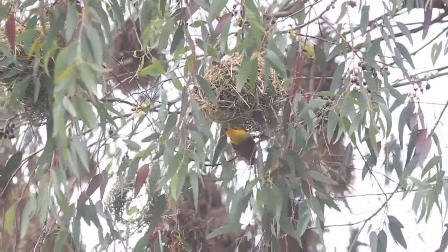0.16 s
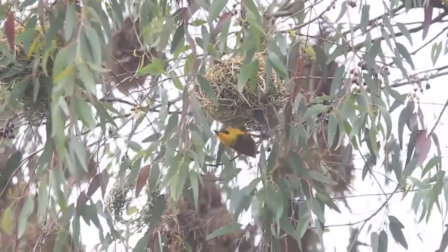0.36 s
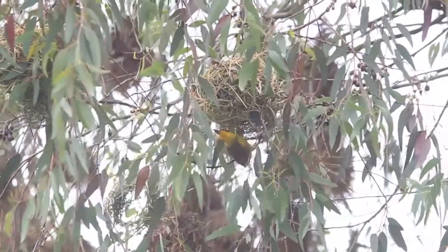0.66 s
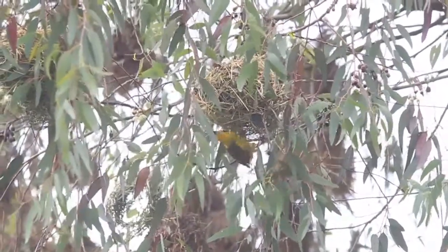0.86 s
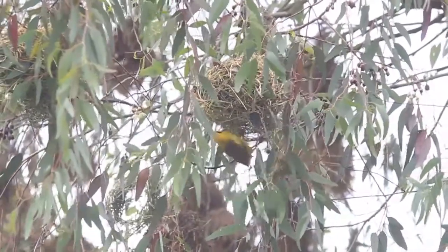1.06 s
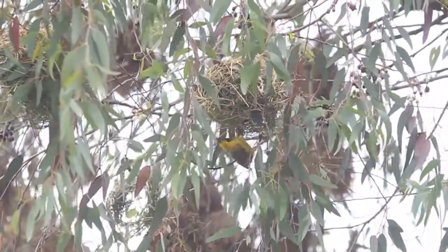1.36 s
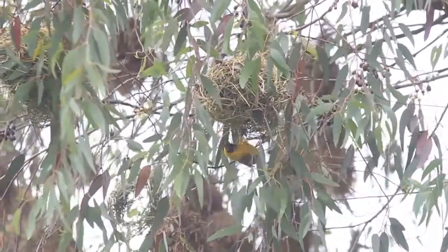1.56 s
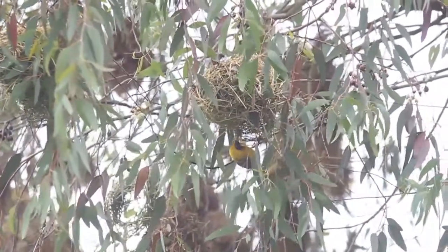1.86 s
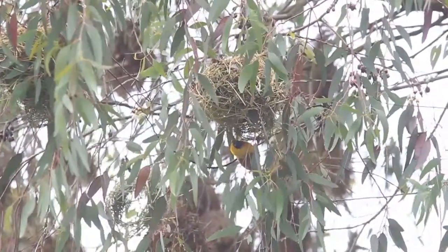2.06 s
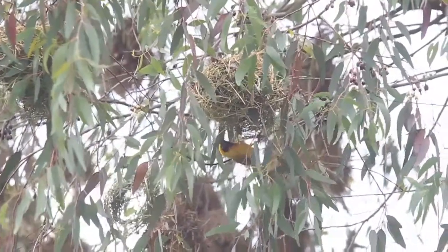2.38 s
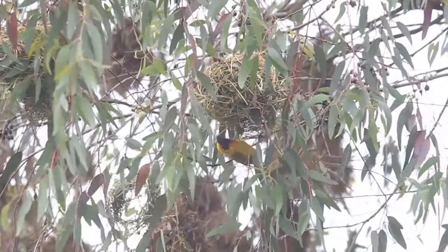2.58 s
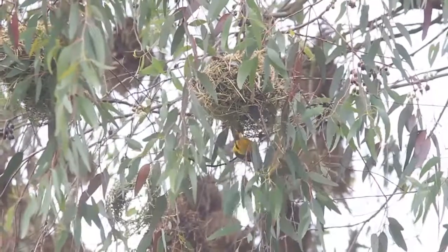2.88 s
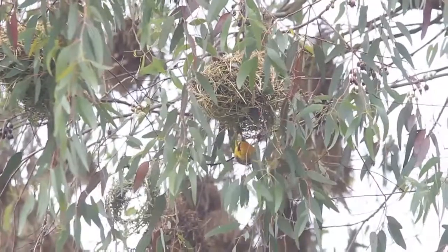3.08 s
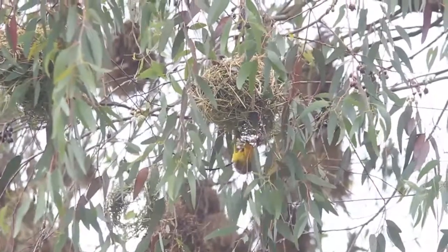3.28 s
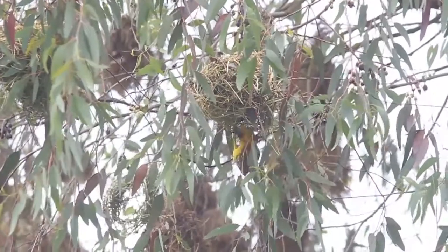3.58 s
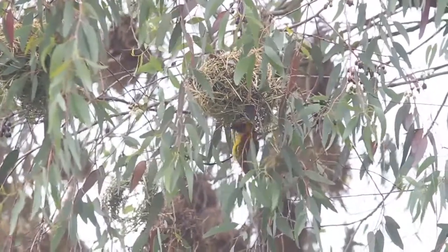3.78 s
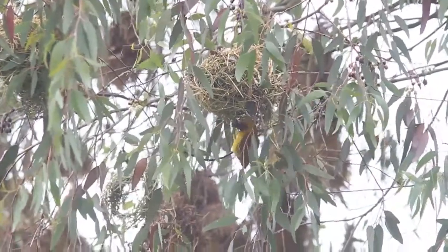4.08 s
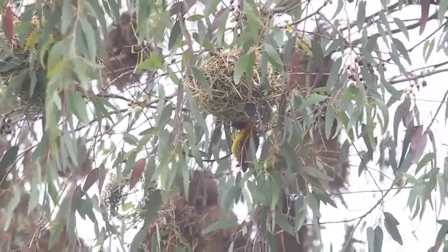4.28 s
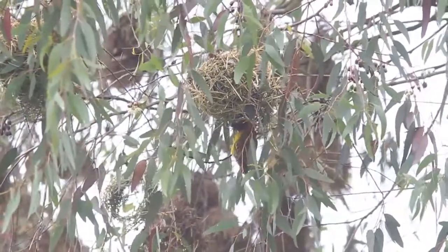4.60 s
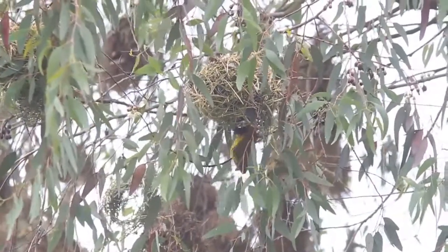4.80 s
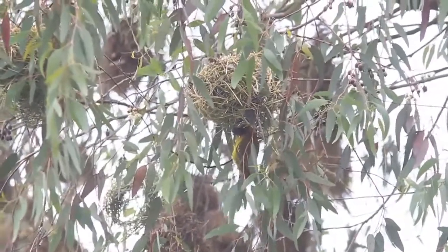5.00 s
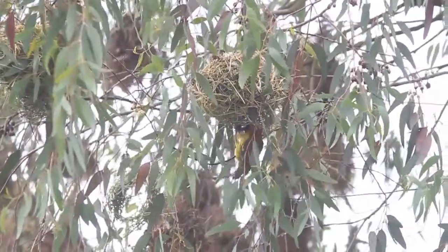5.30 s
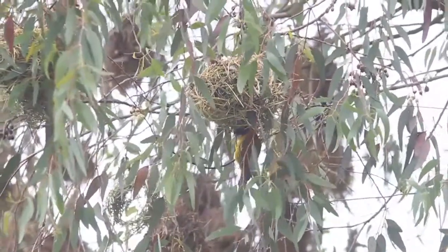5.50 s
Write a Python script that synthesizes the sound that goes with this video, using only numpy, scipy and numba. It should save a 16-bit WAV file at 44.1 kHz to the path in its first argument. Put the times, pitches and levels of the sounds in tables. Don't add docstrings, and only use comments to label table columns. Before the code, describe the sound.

Dense bird chatter outdoors: dry clicks and chips, two loud falling whistles, a quick rattle, a long mechanical buzz, then a wing rush and sharp crack.

```python
import sys
import numpy as np
from scipy import signal
from scipy.fft import rfft, irfft
from scipy.io import wavfile
from scipy.ndimage import uniform_filter1d
from numba import njit

SR = 44100
rng = np.random.default_rng(int(sys.argv[2]) if len(sys.argv) > 2 else 0)


def amplitude_ratio(level_db):
    exponent = np.asarray(level_db, float) / 20
    return 10 ** exponent


def master_out(mix):
    frames = np.transpose(np.atleast_2d(mix))
    ceiling = np.clip(frames, -1, 1)
    pcm = np.round(ceiling * 32767).astype(np.int16)
    wavfile.write(sys.argv[1], SR, pcm)


N = 249165
T = np.arange(N) / SR


def noise():
    return rng.standard_normal(N)


def level(x, db):
    return x * amplitude_ratio(db) / np.sqrt(np.mean(x ** 2))


@njit
def svf(x, hz, width):
    y, b, l = np.empty(len(x)), 0., 0.
    for i in range(len(x)):
        g, k = np.tan(np.pi * hz[i] / SR), width / hz[i]
        v = (b + g * (x[i] - l)) / (1 + g * (g + k))
        b, l, y[i] = 2 * v - b, l + 2 * g * v, k * v
    return y


def band(x, hz, width):
    return svf(x, np.full(len(x), 1. * hz), 1. * width)


def double_band(x, hz, width, second_width):
    return band(band(x, hz, width), hz, second_width)


def colour(x, points):
    hz, db = np.transpose(points)
    f = np.maximum(np.arange(N // 2 + 1) * SR / N, 1)
    return irfft(rfft(x) * amplitude_ratio(np.interp(np.log(f), np.log(hz), db)), N)


def walk(rate):
    k = int(SR / rate)
    steps = np.repeat(rng.standard_normal(N // k + 1), k)
    return level(uniform_filter1d(uniform_filter1d(steps, k), k)[:N], 0)


def hump(start, length, lean=1):
    return np.sin(np.pi * np.clip((T - start) / length, 0, 1) ** lean) ** 2


def whistles(notes, partials, rough, edge_s=0.003, size=200):
    out, shake = np.zeros(N), walk(500)
    for note in notes:
        s, hz, db = np.transpose(note)
        on = (T >= s[0]) & (T < s[-1])
        glide = uniform_filter1d(np.interp(T[on], s, hz), size=size, mode="nearest")
        phase = 2 * np.pi * np.cumsum(glide * (1 + 0.049 * rough * shake[::-1][on])) / SR
        edge = np.clip(np.minimum(T[on] - s[0], s[-1] - T[on]) / edge_s, 0, 1)
        tone = np.sin(phase) + sum(amplitude_ratio(o) * np.sin(k * phase) for k, o in partials)
        size_now = np.sqrt(2) * amplitude_ratio(np.interp(T[on], s, db)) * edge
        out[on] += size_now * (1 + rough * shake[on]) * tone
    return out


def shape_notes(rows, contour, swell_db, fade_db=0):
    u = np.linspace(0, 1, 13)
    swell = swell_db * (2 * u - 1) ** 2 + fade_db * u
    return [np.transpose([s + u * ms / 1000, contour(u, hz, end), db - swell])
            for s, ms, hz, end, db in rows]


def slide(u, hz, end):
    return hz + (end - hz) * u


def arc(start):
    def contour(u, hz, end):
        a, b = np.sqrt(abs(1 - start) * hz), np.sqrt(abs(hz - end))
        return hz - np.sign(1 - start) * ((a + b) * u - a) ** 2
    return contour


def hook(u, hz, _):
    return hz * (1 + 0.36 * np.clip(1 - u / .36, 0, 1) ** 1.23 - 0.13 * (u - .3))


# f/Hz, level/dB per Hz
THROAT = [(590, -17.5), (1000, -19), (1360, -3.5), (1560, -13), (2170, -4), (3150, -1.5), (3890, -0.5),
          (4740, -1.5), (5790, -6), (8240, -11), (14000, -50)]


def syrinx(hz, jitter, breath, since_s=None):
    phase = np.cumsum(hz * (1 + jitter * walk(900))) / SR
    if since_s is not None:
        phase = hz * since_s + 2 * jitter * walk(400)
    clicks = np.clip(np.diff(np.floor(phase), prepend=0), 0, 1) * amplitude_ratio(1.5 * noise())
    spread = np.exp(-1j * (np.arange(N // 2 + 1) * SR / N / 1300) ** 2)
    clicks = irfft(rfft(clicks - clicks.mean()) * spread, N)
    return level(colour(level(clicks, 0) + breath * noise(), THROAT), 0)


def click_bursts(table, lean, breath):
    s, _, _, mouth = np.transpose(table)
    gate = sum(amplitude_ratio(db - 12.0) * hump(t - .002, ms / 1000, lean) for t, db, ms, _ in table)
    voice = syrinx(830, 0.079, breath) * gate
    mouth_hz = mouth[np.clip(np.searchsorted(s, T + .004) - 1, 0, None)]
    return voice + amplitude_ratio(4.0) * svf(voice, mouth_hz, 290.0) + amplitude_ratio(4.0) * band(voice, 1340, 730)


# f/Hz, level/dB per Hz
AIR = [(12, -22), (20, 4.5), (38, -3.5), (70, -1), (464, -6.5), (871, -8), (1140, -17.5), (1570, -12.5),
       (3000, -16.5), (3900, -70), (6600, -120)]
# f/Hz, level/dB per Hz
HISS = [(4000, -18), (8000, 7), (12800, -3.5), (14800, -18), (15600, -22)]


def air():
    rumble = level(colour(noise(), AIR), -56) * amplitude_ratio(0.33 * walk(5.64))
    hum = amplitude_ratio(-56.5) * np.sin(2 * np.pi * 25 * T) * amplitude_ratio(1.2 * walk(8.0))
    return rumble + hum + level(colour(noise(), HISS), -68)


# f/Hz, level/dB per Hz
INSECTS = [(5600, -40), (6100, -10), (6800, 0), (7300, -1), (7650, -8), (8050, -23), (9300, -30),
           (11000, -50)]


def insects():
    flutter = amplitude_ratio(2 * walk(110) + 1.8 * walk(11))
    return level(colour(noise() * flutter, INSECTS), -52)


# f/Hz, level/dB at start, middle and end
CRICKETS = [
    (6655, -49.5, -48.5, -49.5),
    (7610, -47.5, -59, -71),
    (7140, -49, -53, -51),
    (5150, -58, -52.5, -66),
]
# first pulse t/s, chirp period/s, pulses a chirp, pulse rate/Hz
CHIRPS = [
    (.0235, .1474, 5, 58),
    (.049, .1432, 4, 64),
    (-.005, .1258, 3, 64),
    (.085, .191, 5, 60),
]


def crickets():
    out = 0
    for (start, period, pulses, rate), (hz, *db) in zip(CHIRPS, CRICKETS):
        beat = (T - start + .5 / rate) % period * rate
        ends = np.clip(period * rate - beat, 0, 1)
        soft_start = np.clip((beat + 0.92) / 1.9, 0, 1)
        gate = (beat < pulses) * ends * np.sin(np.pi * beat) ** 2 * soft_start
        tone = np.sin(2 * np.pi * np.cumsum(hz * (1 + .012 * walk(300))) / SR)
        loudness = np.interp(T, [0, T[-1] / 2, T[-1]], db) + 2.0 * walk(10.02)
        out = out + 2 * amplitude_ratio(loudness) * gate * tone
    return out


# t/s, level/dB
COLONY = [(0, -43), (.25, -45.5), (.6, -49), (1.1, -48), (1.6, -47.5), (2.0, -51), (2.3, -51.5), (2.7, -49),
          (3.0, -48), (3.5, -54.5), (3.9, -47), (4.2, -47.5), (4.45, -46), (4.64, -40.5), (4.71, -45),
          (4.77, -44), (4.9, -44), (5.3, -43), (5.65, -42.5)]
# f/Hz, level/dB per Hz
FAR = [(590, -10.5), (1000, -3.5), (1490, -9), (2110, -6.5), (2420, -9.5), (3430, 0), (4300, -3), (5200, 1),
       (5900, 0), (7500, -5), (9000, -20.5), (11000, -36)]


def colony():
    twitter = amplitude_ratio(1.6 * walk(60))
    return level(colour(noise() * twitter, FAR), 0) * amplitude_ratio(np.interp(T, *np.transpose(COLONY)))


# t/s, length/ms, turning f/Hz, end f/Hz, level/dB
ARCHES = [(0, 65.5, 2060, 1990, -50), (.1, 24, 3600, 3200, -48), (.262, 80, 3150, 2810, -40.5),
          (.268, 75, 2590, 2180, -47.5), (2.665, 67.5, 2740, 1960, -48), (2.85, 56, 3700, 1900, -36),
          (3.327, 50, 4350, 4300, -50), (3.665, 52, 3850, 3000, -46), (4.8, 90, 3050, 2900, -41),
          (4.962, 88, 2615, 2250, -43)]
# t/s, length/ms, turning f/Hz, end f/Hz, level/dB
DIPS = [
    (2.2, 143, 1785, 2080, -57.5),
    (4.928, 40, 2420, 2480, -50),
]
# t/s, length/ms, from f/Hz, to f/Hz, level/dB
GLIDES = [(0, 12, 3500, 3450, -46), (.025, 20, 2800, 2950, -52), (.095, 30, 2100, 2350, -48),
          (.117, 22, 4850, 4800, -44), (.123, 14, 2000, 1950, -43), (.128, 16, 3550, 3500, -43),
          (.147, 12, 2950, 2950, -42), (.225, 36, 3000, 2730, -50), (.478, 54, 2560, 2270, -50),
          (.5, 69, 3300, 3900, -47), (1.325, 20, 4150, 4100, -50), (1.885, 24, 2500, 3000, -51),
          (1.908, 22, 2600, 3100, -51), (2.11, 87, 2420, 2330, -54), (2.325, 66, 2080, 2240, -51.5),
          (2.435, 80, 2614, 2760, -42), (2.52, 88, 3250, 2670, -43.5), (2.898, 73, 1880, 1474, -52),
          (3.9, 36, 2340, 2270, -59), (3.925, 35, 3620, 4230, -61), (4.225, 34, 2700, 2950, -51),
          (4.45, 33, 2620, 2860, -48), (4.97, 37, 6100, 5300, -57), (5.05, 43, 2350, 2260, -52),
          (5.1, 31, 5880, 5100, -52)]


def clear_whistles():
    bent = shape_notes(ARCHES, arc(.86), 5.5) + shape_notes(DIPS, arc(1.4), -9)
    return whistles(bent + shape_notes(GLIDES, slide, 5.5), [(1.6, -24)], .13, size=100)


# t/s, length/ms, level/dB
RASPS = [(.0, 33, -40), (.093, 88, -37.5), (.476, 69, -44), (.528, 140, -45.5), (.697, 99, -44),
         (.81, 65, -44.5), (.866, 140, -45.5), (.965, 120, -48), (1.03, 120, -44), (1.075, 37, -45),
         (1.15, 100, -45), (1.194, 170, -46), (1.355, 140, -45.5), (2.49, 29, -68)]
# f/Hz, level/dB per Hz
RASP = [(3500, -27), (5000, -2), (6200, 2), (7800, -4), (9200, -14.5), (11000, -35)]


def rasps():
    gate = sum(amplitude_ratio(db) * hump(s - .001, ms / 1000, lean=.35) for s, ms, db in RASPS)
    return level(colour(noise() * amplitude_ratio(1.2 * walk(250)), RASP), 0) * gate


# t/s, peak/dB, length/ms, mouth f/Hz
TICKS = [(0, -29.5, 23, 5800), (.093, -29, 103, 5400), (.288, -29.5, 18, 1800), (.31, -35.5, 120, 6200),
         (.392, -27.5, 13, 2760), (.43, -34, 7.5, 1510), (.476, -30, 49, 5640), (.528, -27, 26, 4960),
         (.696, -26, 19, 1400), (.866, -27, 20, 1390), (1.03, -27, 19, 1400), (1.193, -26.5, 19, 1400),
         (1.354, -28, 15, 1400)]


def ticks():
    return click_bursts(TICKS, lean=.4, breath=1.5)


# t/s, length/ms, from f/Hz, to f/Hz, level/dB
SQUEALS = [
    (.093, 11, 6170, 5630, -31.5),
    (.11, 57, 5750, 4900, -50),
    (.258, 34, 5420, 6170, -32.5),
    (.287, 30, 6080, 6980, -36),
    (.318, 24, 7000, 6150, -39),
    (.328, 20, 6400, 4960, -35),
    (.345, 16, 5150, 5130, -39),
    (.4, 30, 5100, 5000, -56),
]


def squeals():
    return whistles(shape_notes(SQUEALS, slide, 0, 0.5), [(3 / 2, -25), (2, -42)], 0.35)


# t/s, peak/dB, mouth f/Hz
CLACKS = [(0.1204, -25, 3500), (0.144, -26, 4840), (0.356, -22, 2900), (0.73, -24, 4100),
          (0.886, -26, 4170), (1.074, -20.5, 2840), (1.146, -27.5, 3940), (1.297, -24, 4000),
          (1.5518, -24, 3900), (1.702, -21, 3300), (1.8352, -23, 4050), (2.0063, -21, 4080),
          (2.076, -22.5, 5630), (2.186, -25, 4600), (2.5353, -28.5, 3100), (2.7704, -22, 3540),
          (5.449, -19.5, 4040)]


def clacks():
    length_ms = 19
    return click_bursts([(s, db, length_ms, hz) for s, db, hz in CLACKS], lean=1.25, breath=.4)


# t/s, level/dB
COOS = [(.13, -60), (.55, -62), (.87, -69), (1.62, -59), (2.23, -58.5), (2.67, -56.5), (3.29, -58),
        (3.73, -57), (4.0, -59), (4.33, -57)]


def dove():
    throat = level(double_band(noise(), 893, 76, 76), -0.27)
    return throat * (amplitude_ratio(-68) + sum(amplitude_ratio(db) * hump(s, 0.11) for s, db in COOS))


# t/s, length/ms, from f/Hz, to f/Hz, level/dB
STROKES = [(.165, 24, 4100, 2800, -47), (.228, 30, 5100, 2600, -47), (.297, 18, 5300, 3850, -43),
           (.313, 24, 3900, 3000, -41), (.336, 10, 8000, 6000, -42), (.35, 10, 5200, 4000, -48),
           (.377, 16, 4800, 3400, -51), (.39, 8, 3300, 2300, -42), (.405, 39, 6700, 5900, -48.5),
           (1.086, 11, 2700, 1950, -40), (1.087, 11, 5700, 3900, -43), (1.466, 28, 5900, 5300, -48),
           (1.489, 14, 2650, 1900, -42), (1.492, 11, 5600, 3500, -42), (1.803, 15, 5900, 3000, -30),
           (1.97, 30, 5660, 5200, -55), (2.497, 12, 3950, 2800, -40), (4.04, 24, 3700, 3000, -48),
           (4.14, 24, 3500, 2900, -51), (4.275, 17, 4800, 3020, -38), (4.338, 11, 2000, 3400, -43),
           (4.6, 30, 3650, 3030, -50), (4.925, 16, 3900, 3200, -38)]


def strokes():
    return whistles(shape_notes(STROKES, slide, 0), [], 0.25, size=60)


# t/s, peak/dB
BUMPS = [
    (0.285, -45.5),
    (0.486, -44.5),
    (0.536, -43),
    (1.05, -41.5),
    (2.062, -47),
    (3.221, -40),
    (4.811, -37.5),
    (5.271, -40),
]


def bumps():
    gate = sum(amplitude_ratio(db - 4.5) * hump(s, 0.033, lean=0.33) for s, db in BUMPS)
    return gate * level(band(band(noise(), 280, 760), 350, 1200), 0)


# t/s, length/ms, from f/Hz, to f/Hz, level/dB
HOARSE = [
    (1.625, 190, 8400, 8570, -53),
    (2.035, 110, 5020, 5120, -51),
    (2.51, 40, 4250, 5130, -46),
    (.49, 50, 3380, 3650, -49),
]


def hoarse_notes():
    throb = .6 + .45 * np.cos(2 * np.pi * (58 * (T - 1.732) + .1 * walk(30)))
    return throb * whistles(shape_notes(HOARSE, slide, 2.0), [], 0.22)


# t/s, peak/dB, start f/Hz
CHIPS = [(0.655, -35.5, 4440), (0.807, -34, 4500), (0.9638, -35.5, 4500), (1.2188, -34.5, 4490),
         (1.365, -32.5, 4330), (1.626, -32, 4620), (1.768, -32, 4580), (1.927, -30.5, 4550),
         (4.434, -34, 4330), (4.737, -33.5, 3940), (5.09, -34, 4300), (5.248, -32.5, 4210)]


def chips():
    upper, lower = [], []
    for s, db, hz in CHIPS:
        upper.append([(s - .001, 1. * hz, db), (s + .007, .95 * hz, db - 1),
                      (s + .012, max(.83 * hz, 3500), db), (s + .019, 3000, db - 4)])
        lower.append([(s + 0.0033, 0.81 * hz, db + 8), (s + 0.00716, 3100, db - 10.0),
                      (s + 0.0111, 1950, db - 9.5), (s + 0.0196, 1450, db - 18)])
    voices = whistles(upper, [(2, -24)], .3, edge_s=.0012, size=60)
    voices = voices + whistles(lower, [], .12, edge_s=.0012, size=60)
    gate = sum(amplitude_ratio(db - 11.0) * hump(s - .001, 0.031, lean=0.64) for s, db, _ in CHIPS)
    hiss = gate * syrinx(1100, 0.67, 0.72)
    return voices + amplitude_ratio(4.0) * hiss + amplitude_ratio(9.0) * band(hiss, 3850, 1100)


# t/s, length/ms, knee f/Hz, level/dB
HOOKS = [
    (1.038, 52, 2986, -28.5),
    (1.442, 54, 2956, -27.5),
    (4.517, 52, 3040, -28.5),
    (5.316, 46.4, 3070, -25.5),
]


def hooked_calls():
    rows = [(s, ms, hz, hz, db) for s, ms, hz, db in HOOKS]
    return whistles(shape_notes(rows, hook, 3.9, 8), [(1.5, -27)], 0.064, size=100)


# t/s, f/Hz, level/dB
LONG = [
    [(2.563, 4600, -35), (2.570, 4810, -25.5), (2.588, 4696, -22.5), (2.65, 4523, -22), (2.691, 4345, -23),
     (2.727, 4150, -21), (2.738, 3850, -23), (2.744, 3170, -30.5), (2.751, 2470, -44)],
    [(2.805, 4780, -29), (2.818, 4664, -20.5), (2.858, 4564, -23.5), (2.899, 4417, -21.5),
     (2.963, 3946, -23.5), (3.035, 3450, -23), (3.069, 3210, -27.5), (3.103, 2790, -32), (3.115, 2610, -43)],
]
# t/s, half width/ms, depth/dB
LEVEL_DIPS = [(2.607, 3.9, 8), (2.626, 4, 1.5), (2.644, 1.2, 5), (2.665, 6.4, 3.5), (2.677, 1.2, 15),
              (2.711, 12.3, 11.5), (2.836, 2.4, 5), (2.867, 2.8, 2), (2.903, 1.3, 14), (2.912, 2, 12),
              (2.927, 11, 10), (2.992, 4.2, 4.5), (3.012, 11, 5.5), (3.028, 1.8, 3), (3.083, 3.5, 3)]


def gape(x):
    return double_band(x, 8600, 1500, 3000)


def long_whistles():
    dipping = amplitude_ratio(-sum(db * np.exp(-((T - s) * 1000 / ms) ** 2) for s, ms, db in LEVEL_DIPS))
    clear = whistles(LONG, [], 0) * (1 + 0.063 * walk(300))
    overtones = []
    for k in (2, 3):
        notes = [np.array(note) * [1, k, 1] for note in LONG]
        overtones.append(whistles(notes, [], 0.035) * amplitude_ratio(3.1 * walk(50)))
    second, third = overtones
    return dipping * (clear + amplitude_ratio(-21.5) * gape(second) + amplitude_ratio(-27) * gape(third) + amplitude_ratio(-43.5) * third)


def rattle():
    start_s, gap_s, peak_db, length_ms, mouth_hz = 3.1505, .0532, -25, 12.8, 3300
    run = [(start_s + k * gap_s, peak_db, length_ms, mouth_hz) for k in range(6)]
    bursts = click_bursts(run, lean=1.1, breath=0.49)
    return colour(bursts, [(1500, 0.0), (3300, 0.5), (5000, -0.5), (7000, -8.5)])


# centre of first pulse t/s, pulses, pulse rate/Hz, level/dB
BUZZ = [(3.4646, 3.36, 123, -34), (3.5445, 4.6, 105, -36), (3.636, 5.6, 110.6, -35.5),
        (3.7373, 6.5, 109.3, -36), (3.856, 4.9, 109.0, -35), (3.956, 6.5, 111, -35),
        (4.059, 11.9, 192, -35), (4.164, 10.8, 187, -33), (4.2603, 15, 201, -34), (4.355, 16.8, 200, -34.5),
        (4.472, 7.8, 99.1, -37.5), (4.6083, 7.35, 94, -36), (4.7273, 9.4, 91, -37.5),
        (4.861, 8.7, 88.7, -37), (4.994, 5.9, 62.5, -38), (5.134, 6.6, 58.1, -41), (5.286, 7, 58.7, -40)]
# f/Hz, width/Hz, level/dB
BEAK = [(1800, 100, 2), (2200, 390, -1), (3900, 570, -1), (4900, 590, 3.5), (8600, 8200, -33)]


def buzz():
    gate, sizzle, since_s = np.zeros(N), np.zeros(N), np.zeros(N)
    chest_hz, wild = np.full(N, 1330.), np.full(N, .05)
    for s, pulses, rate, db in BUZZ:
        slow, quick = rate < 103, rate > 150
        swell = hump(s - 0.75 / rate, (pulses + 0.5) / rate) ** 0.27
        swell *= np.where(T < s + .5 / rate, amplitude_ratio(-3), 1)
        if quick:
            swell *= hump(s - 2 / rate, (pulses + 3) / rate) ** 0.1
        cycle = ((T - s) * rate + .5) % 1 - .5 + (.05 if slow else .02) * walk(rate)
        stretch = 1 if not slow else 1.15 if rate > 70 else 1.35
        burst = np.exp(-(cycle / np.where(cycle < 0, .14, .33) / stretch) ** 2)
        gate += amplitude_ratio(db) * swell * burst
        since_s = np.where(T > s - 1 / rate, cycle / rate, since_s)
        sizzle += amplitude_ratio(db - 9) * swell * (0.59 + burst) * np.exp(-np.clip(T - s, 0, 1) / 0.041)
        if slow or quick:
            chest_hz[T > s - .01] = 925 if slow else 1400
            wild[T > s - .01] = .3 if rate < 70 else .04 if slow else .05
    gate *= amplitude_ratio(.8 * walk(120))
    low = chest_hz < 1000
    chest = svf(svf(noise() * gate, chest_hz, 180.0), chest_hz, 200.0)
    chest = chest * (wild < .1) * np.where(low, amplitude_ratio(3), 1)
    click_hz = np.where(chest_hz > 1000, chest_hz / 2, chest_hz)
    voice = syrinx(click_hz, wild, .55, since_s) * gate
    beak = sum(amplitude_ratio(db) * band(voice, hz, width) for hz, width, db in BEAK)
    breath = double_band(noise(), 7500, 3000, 3000) * sizzle
    ring = amplitude_ratio(7) * band(noise() * gate * low, 1600, 400)
    return breath + ring + voice + beak + amplitude_ratio(10.5) * chest


def motor():
    return amplitude_ratio(-57) * hump(3.55, 0.59) * level(double_band(noise(), 122.2, 14, 13), 0)


# t/s, length/s, level/dB
WINGS = [
    (5.406, 0.14, -36.5),
    (5.497, 0.099, -27),
    (5.569, 0.054, -24.5),
    (5.592, 0.04, -23.5),
    (5.617, 0.049, -34),
]
# f/Hz, level/dB per Hz
FEATHERS = [(150, -52), (250, -22), (352, -12.5), (641, -28), (873, -3), (1150, -11), (1250, -9),
            (1590, -11), (1990, -9.5), (3200, -10), (3850, 1.5), (4700, -8.5), (8820, -30), (15000, -75)]


def wings():
    throb = amplitude_ratio(2.5 * np.cos(2 * np.pi * 52 * (T - 5.458)) + 1.2 * walk(90))
    near = sum(amplitude_ratio(db) * hump(s, length, lean=0.84) ** 0.7 for s, length, db in WINGS)
    return level(colour(noise() * throb, FEATHERS), 0) * near


# t/s, dull part/dB, bright part/dB
SNAP = [
    (5.6078, 2, -1),
    (5.6092, -1, -6),
    (5.6106, -6, -5),
    (5.6132, -12, -4),
    (5.6156, -16, -10),
    (5.6174, -13, -5),
    (5.6205, -20, -17),
    (5.625, -22, -18),
]
# f/Hz, width/Hz, level/dB
TWIG = [(370, 72, -8), (1400, 410, -4.5), (1900, 320, 5.5), (2570, 340, -14), (3100, 650, -3.5),
        (3900, 320, 4), (4500, 480, 0), (5490, 620, -2), (8000, 1600, -13)]


def snap():
    crack = .6 * noise()
    crack[[int(s * SR) + 1 for s, *_ in SNAP]] = -7
    decay = [(T >= s) * np.exp(-np.abs(T - s) / .0022) for s, *_ in SNAP]
    dull = crack * sum(amplitude_ratio(row[1]) * d for row, d in zip(SNAP, decay))
    bright = crack * sum(amplitude_ratio(row[2]) * d for row, d in zip(SNAP, decay))
    ringing = 0
    for hz, width, db in TWIG:
        blow = dull if hz < 3000 else bright
        ringing = ringing + amplitude_ratio(db) * double_band(blow, hz, width, 2 * width)
    ringing = colour(ringing, [(8500, 0), (10500, -15), (16000, -19)])
    return .97 * ringing / np.abs(ringing).max()


def leafy_tail(x):
    decay_s = 0.14
    leaves = rng.standard_normal(SR // 4) * np.exp(-np.log(1000) * T[:SR // 4] / decay_s)
    return signal.fftconvolve(x, leaves / np.sqrt(np.sum(leaves ** 2)))[:N]


# delay t/s, level/dB
ECHOES = [
    (0.0089, -29),
    (0.0081, -26),
]


def scene():
    tonal = clear_whistles() + squeals() + strokes() + hoarse_notes() + chips() + hooked_calls()
    tonal = tonal + sum(amplitude_ratio(db) * np.roll(tonal, int(lag * SR)) for lag, db in ECHOES)
    birds = tonal + rasps() + ticks() + clacks() + rattle() + buzz()
    solo = long_whistles()
    tail = amplitude_ratio(-7.5) * leafy_tail(birds + amplitude_ratio(-3.5) * solo)
    background = air() + insects() + crickets() + colony() + dove() + bumps() + motor()
    return (birds + solo + tail + wings() + snap() + background)[None]


def low_pass(x):
    return signal.sosfilt(signal.butter(12, 15530, fs=SR, output="sos"), x)


def record(dry):
    mix = colour(dry[0], [(14900, 0), (15500, -22)])[None]
    return low_pass(mix)


dry = scene()
out = record(dry)
master_out(out)
```